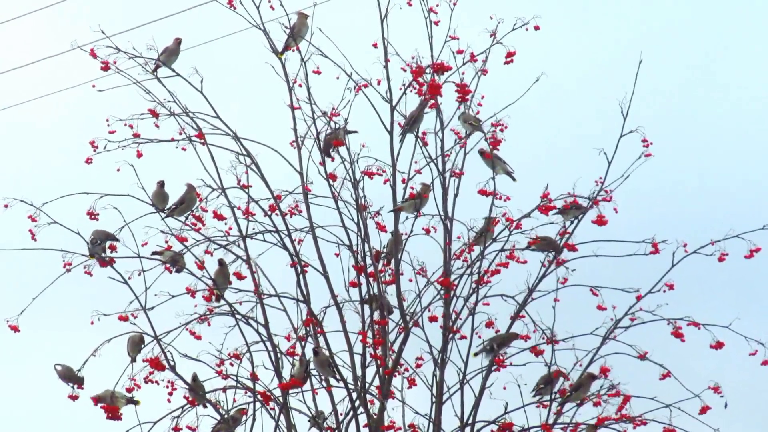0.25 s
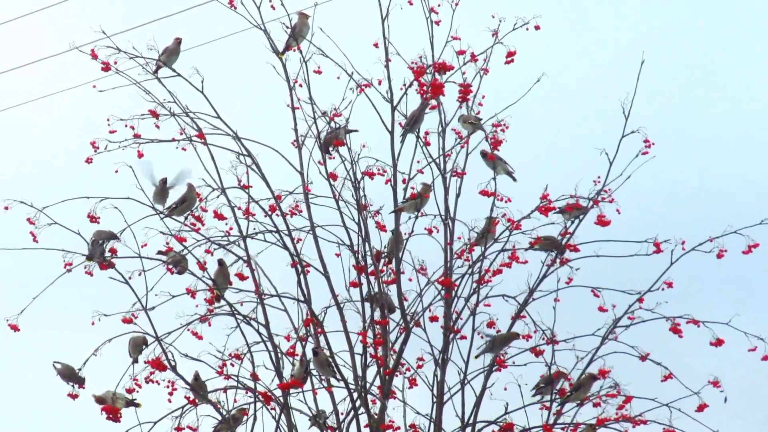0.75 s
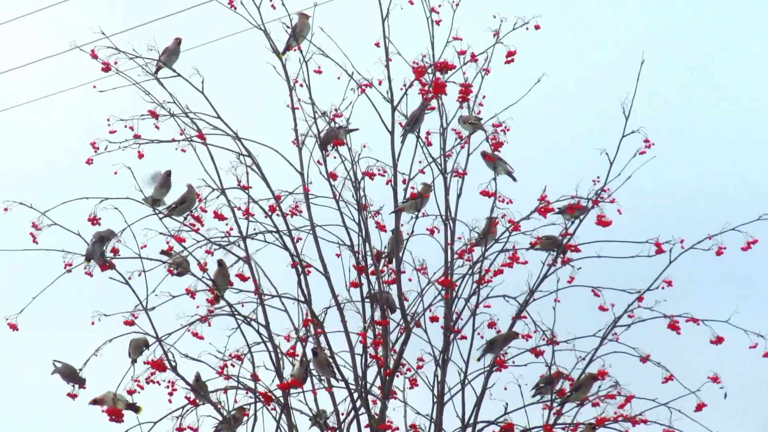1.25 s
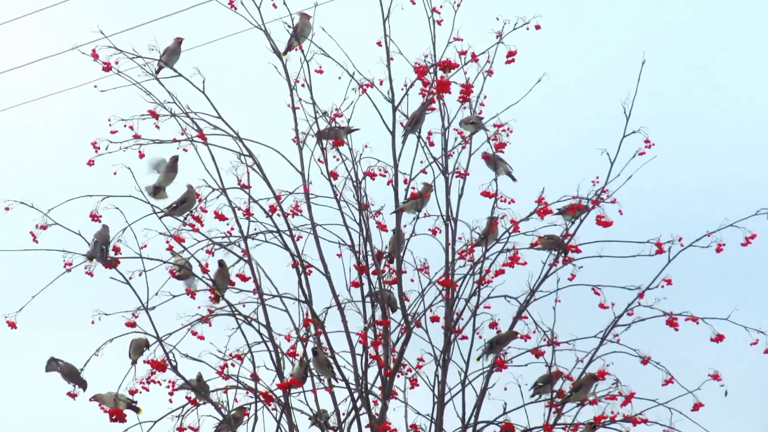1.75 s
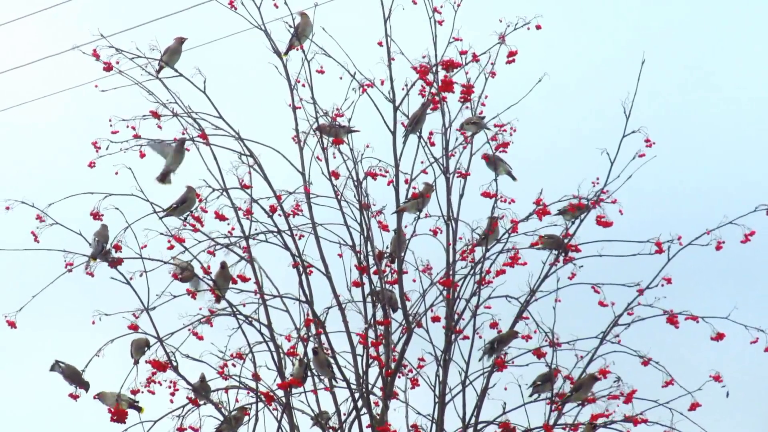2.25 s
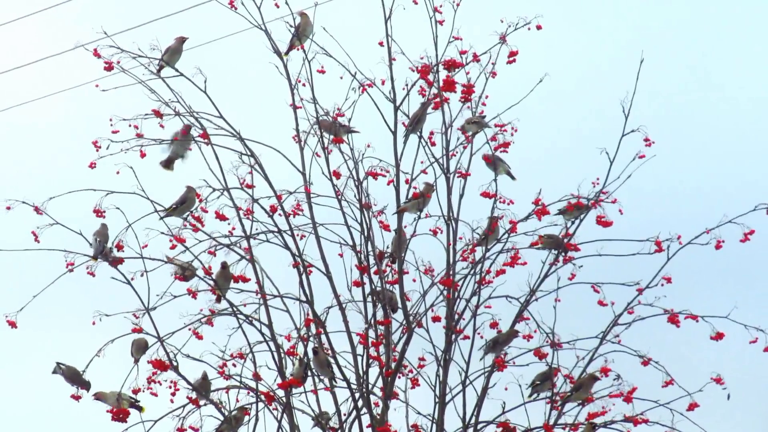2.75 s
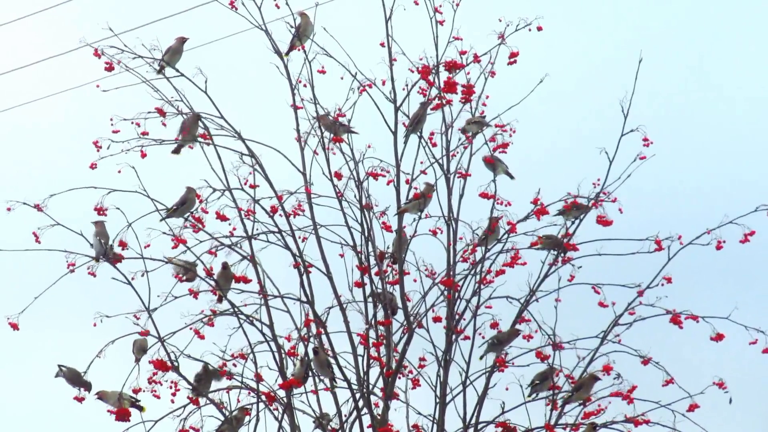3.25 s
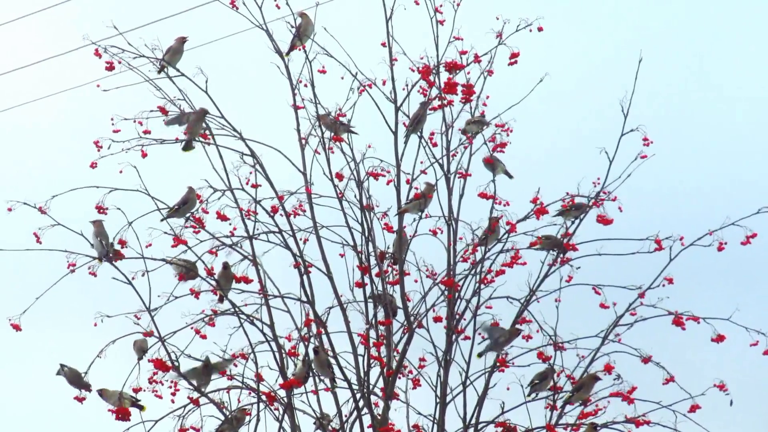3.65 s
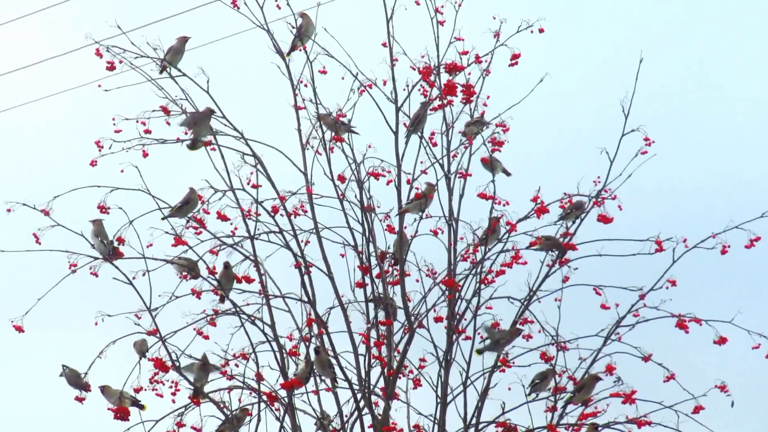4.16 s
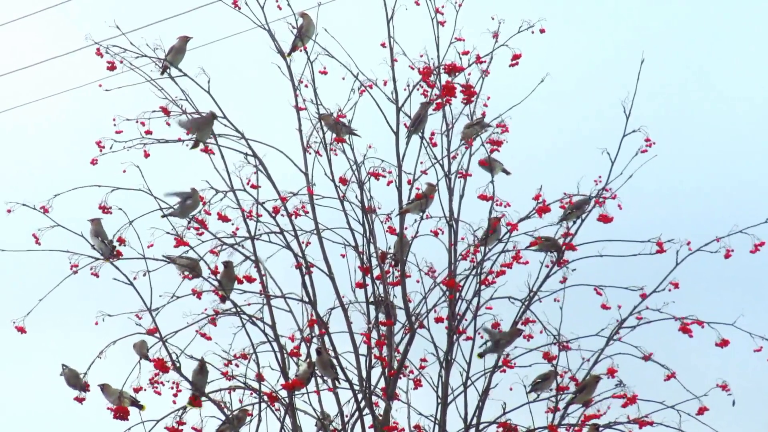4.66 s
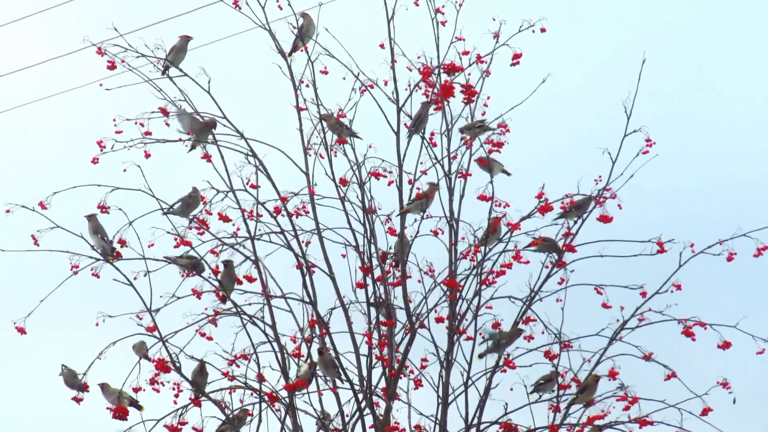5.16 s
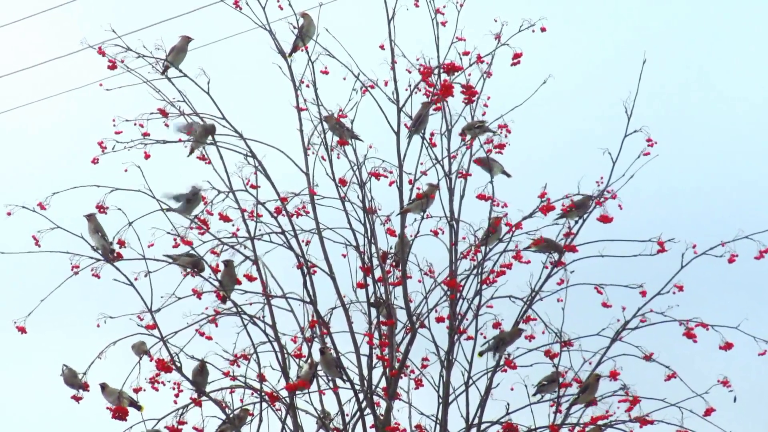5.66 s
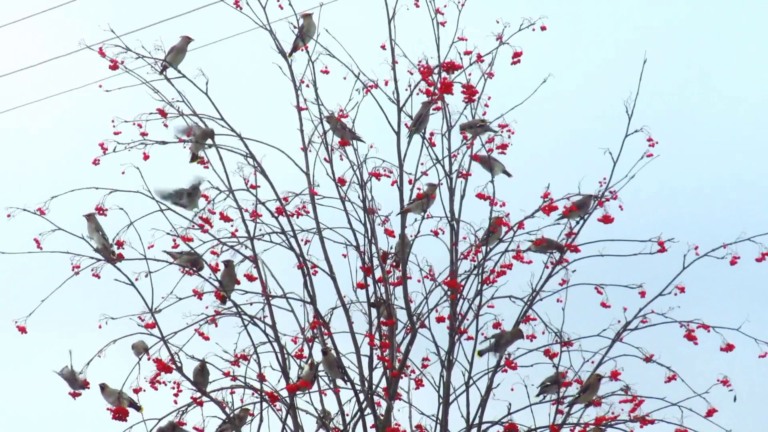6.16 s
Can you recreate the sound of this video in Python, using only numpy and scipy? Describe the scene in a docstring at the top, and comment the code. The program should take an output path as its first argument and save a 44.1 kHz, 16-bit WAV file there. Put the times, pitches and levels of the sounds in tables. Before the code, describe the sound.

Small birds in a berry tree outdoors. Faint whistles and chinking calls open, then one close finch sings loud high trills, scooping notes, a rattle, a flourish and a falling buzz. A softer second bird answers with a rising buzz and quick downward slides. A distant quiet warble ends it. Slight echo, low airy hiss and tiny wing flaps; stereo microphone outdoors.

```python
"""Songbirds among trees

A near finch sings three trills, a flourish and a falling buzz; a second answers from slightly to the left.
Distant birds whistle, chink and slur under a flock's thin trills, and a nearer bird warbles, while an earlier
song fades, all as gliding near-sines, some buzzing with fast pitch wobble. Trunks and ground scatter the notes
as an echo and decaying noise haze. Shaped noise makes far traffic and hiss; short noise bands make wing flaps
and rustles."""
import sys
import numpy as np
from scipy import signal
from scipy.fft import rfft, irfft, next_fast_len
from scipy.io import wavfile

SR = 44100
rng = np.random.default_rng(int(sys.argv[2]) if len(sys.argv) > 2 else 0)


def persist_wave(psi):
    """Save psi, clipped to +-1, as 16-bit WAV."""
    counts = np.round(np.clip(psi, -1, 1) * 32767).astype(np.int16)
    wavfile.write(sys.argv[1], SR, np.atleast_2d(counts).T)


N = 282681

# how sharply most calls bend onto their end pitch
HOOK = 2.5


def undb(db):
    """Turns decibels into an amplitude factor."""
    return 10 ** (np.asarray(db) / 20)


def unit(x):
    """Scales a signal to an RMS of one."""
    return x / np.sqrt(np.mean(x ** 2))


def add(out, s, x, pan_db):
    """Mixes x in at time s; pan_db is left minus right level."""
    i = int(s * SR)
    out[:, i:i + len(x)] += np.outer(undb([pan_db / 2, -pan_db / 2]), x[:N - i])


def walk(rate, size):
    """Random values, rate points per second, joined by lines."""
    points = rng.standard_normal(64 + int(rate * N / SR))
    return np.interp(np.arange(size) * rate / SR, np.arange(len(points)), points)


def air():
    """Far traffic and hiss: shaped noise in overlapping bands whose levels wander."""
    # colour of the noise: (frequency [Hz], relative level [dB])
    colour = [(18, -76.5), (30, -56), (81, -40), (182, -19.5), (332, -4), (443, -1), (691, -4.5), (767, -4),
              (852, -7), (1720, -14), (2760, -10), (4310, -18.5), (4660, -13), (5740, -20), (15500, -25)]
    # distant traffic comes and goes: (time [s], level [dB])
    swell = [(0, 0.3), (1.5, 0.5), (2.7, 2.7), (4, -1.14), (5.3, .2), (6.41, -2)]
    level_db, side_share, wander_db = -53.5, .83, .64
    size = next_fast_len(N)
    hz = np.maximum(np.fft.rfftfreq(size, 1 / SR), 1)
    mid, side = rng.standard_normal((2, size))
    # long waves reach both channels more alike
    unlike = side_share * np.clip(hz / 600, .6, 1)
    colour_hz, colour_db = np.transpose(colour)
    spectrum = rfft(mid) + unlike * rfft(side) * np.array([[1], [-1]])
    spectrum = spectrum * undb(np.interp(np.log(hz), np.log(colour_hz), colour_db))
    out = 0
    # band centres two octaves apart, as powers of two in Hz; the last band stays open at the top
    for octave in range(5, 15, 2):
        if octave < 13:
            share = np.clip(1 - abs(np.log2(hz) - octave) / 2, 0, 1)
        else:
            share = np.clip((np.log2(hz) - 11) / 2, 0, 1)
        band = irfft(spectrum * share, size)[:, :N]
        out = out + band * undb(wander_db * walk(5.5, size=N))
    return unit(out) * undb(level_db + np.interp(np.arange(N) / SR, *np.transpose(swell)))


def flock(count=200):
    """Many birds trill briefly at random: thin tones chopped into rising pips."""
    # loudness of the flock: (time [s], level [dB])
    loudness = [(0.0, -82), (1.1, -80), (1.19, -49), (1.5, -44.5), (2.0, -59), (2.43, -69), (2.84, -60),
                (2.98, -75), (3.39, -59), (3.71, -56), (3.92, -70), (4.21, -60.5), (4.55, -72), (4.8, -60),
                (5.07, -72.5), (5.91, -87), (6.41, -82)]
    centre_hz, pitch_range_hz, pip_rise_hz = 6780, 1976, 1672
    level_db = -4
    out = np.zeros((2, N))
    t = np.arange(int(.3 * SR)) / SR
    for place, pitch, size, side in rng.random((count, 4)):
        # louder birds also trill faster, around 24 pips a second
        beat = t * 24 * (.85 + .3 * size) % 1
        hz = centre_hz + pitch_range_hz * (pitch - .5) + pip_rise_hz * (beat - .5)
        tone = np.sin(2 * np.pi * np.cumsum(hz) / SR)
        pips = tone * np.sin(np.pi * beat) ** 4 * np.hanning(len(t))
        add(out, place * N / SR, pips * undb(13 * size), 12 * (side - .5))
    return unit(out) * undb(level_db + np.interp(np.arange(N) / SR, *np.transpose(loudness)))


def whistle(hz, db, swing_hz, rate_hz, bright_db):
    """A near-sine, buzzing if its pitch wobbles fast; weak overtones, roughened by fast random level
    changes, are strongest near one fixed pitch."""
    # overtones from the second harmonic up: (level before the bird's brightness [dB])
    overtone_db = [-42.5, -32.5, -31]
    peak_hz, peak_width_hz = 13270, 1700
    t = np.arange(len(hz)) / SR
    beat = 2 * np.pi * (rate_hz * t + .25 * walk(90, size=len(t)))
    hz = hz * (1 + .002 * walk(250, size=len(t)))
    # the wobble is widest where the note is highest
    hz = hz + swing_hz * (hz / hz.max()) ** 1.5 * np.sin(beat)
    phase = 2 * np.pi * np.cumsum(hz) / SR
    tone = np.sin(phase)
    for harmonic, over_db in enumerate(overtone_db, start=2):
        peak = np.exp(-((harmonic * hz - peak_hz) / peak_width_hz) ** 2)
        roughness = undb(over_db + bright_db) * walk(3000, size=len(t))
        tone += roughness * peak * np.sin(harmonic * phase)
    # 2 ms fades at both ends
    edge = np.clip(np.minimum(t, t[::-1]) / .002, 0, 1)
    level = undb(db + 1.3 * walk(180, size=len(t)))
    return tone * level * np.sin(edge * np.pi / 2) ** 2


def calls(table, hook, fade_db):
    """Single calls that swell in, glide quickly to their end pitch and may fade."""
    out = np.zeros((2, N))
    for s, length, start_hz, end_hz, db, pan_db, swing_hz in table:
        part = np.arange(0, 1, 1 / max(length * SR, 99))
        swell_db = db - 9 * (part - .55) ** 2 - 10 * np.exp(-part / .045) - fade_db * part
        hz = end_hz + (start_hz - end_hz) * (1 - part) ** hook
        add(out, s, whistle(hz, swell_db, swing_hz, 210, -30), pan_db)
    return out


def earlier_song(count=20):
    """The fading haze of an earlier song, made of short, strongly buzzing notes at random pitches."""
    level_db, fade_db_per_s, end_s = -52, 11, .8
    centre_hz, spread_hz, swing_hz = 3550, 1200, 600
    rows = []
    for k, (pitch, side) in enumerate(rng.uniform(-1, 1, (count, 2))):
        s = end_s * (k / count) ** 3
        hz = centre_hz + spread_hz * pitch
        rows.append((s, .05, 1.05 * hz, hz, level_db - fade_db_per_s * s, 4 * side, swing_hz))
    return calls(rows, HOOK, 0)


def whistlers():
    """Pure notes, nearly steady in pitch and level."""
    # (time [s], length [s], pitch [Hz], level [dB], left minus right [dB])
    notes = [(.041, .056, 3915, -32, -2), (.22, .29, 2025, -56.5, 2.5), (.529, .075, 3910, -33, -1.5),
             (1.06, .07, 3860, -34.5, -5), (1.602, .16, 2065, -65, 0), (3.533, .017, 4050, -53, -6),
             (3.57, .022, 3980, -54, 2), (4.898, .12, 6710, -60.5, -18), (5.18, .09, 2290, -60, -4),
             (5.448, .044, 1805, -56, -4), (5.55, .04, 1836, -61, -4), (5.62, .06, 1812, -63, -4),
             (5.71, .081, 2505, -61, -7), (6.248, .11, 2312, -58.5, -15)]
    fall = 1.003  # start pitch over end pitch
    rows = [(s, length, hz * fall, hz, db, pan_db, 0) for s, length, hz, db, pan_db in notes]
    return calls(rows, HOOK, .1)


def slurs():
    """Buzzy calls that slide from one pitch to another."""
    # (time [s], length [s], start [Hz], end [Hz], level [dB], left minus right [dB])
    slides = [(.106, .15, 3560, 2555, -45.5, -5), (.377, .082, 2800, 3315, -47, -5),
              (.46, .056, 3150, 3510, -53, -4), (1.44, .082, 2500, 4310, -51, 4),
              (4.39, .04, 4700, 4830, -43.5, 4), (4.538, .055, 7370, 7260, -61, -1),
              (4.574, .064, 6460, 6290, -50, -5), (4.728, .12, 7700, 7350, -53, -7),
              (5.037, .032, 4200, 4390, -47, -11), (5.11, .078, 3595, 3230, -43.5, -7)]
    swing_hz = 130
    return calls([(*slide, swing_hz) for slide in slides], HOOK, 0)


def chinks():
    """Short buzzy calls, hooked sharply down onto their pitch."""
    # (time [s], length [s], end pitch [Hz], level [dB])
    notes = [(.241, .085, 4480, -38), (.764, .095, 4330, -39.5), (1.287, .04, 9090, -44.5),
             (1.617, .035, 9060, -47), (2.022, .04, 8480, -43.5), (2.791, .069, 6550, -50.5),
             (5.093, .012, 3900, -41)]
    fall_hz, swing_hz, pan_db = 850, 130, -5
    rows = [(s, length, hz + fall_hz, hz, db, pan_db, swing_hz) for s, length, hz, db in notes]
    return calls(rows, 3.2, 0)


def flaps():
    """Short puffs of band noise: dull wing beats and bright rustles of feathers and twigs."""
    # dull wing flaps close by: (time [s], length [s], centre [Hz], level [dB])
    beats = [(1.571, .057, 795, -52.5), (1.633, .029, 504, -46.5), (1.918, .0088, 690, -45.5),
             (2.404, .069, 750, -46), (2.523, .046, 780, -46), (2.8, .18, 777, -55),
             (3.266, .016, 744, -52.5)]
    # bright rustles: (time [s], length [s], level [dB])
    rustles = [(.9, .035, -60), (3.558, .055, -60), (4.415, .08, -65), (5.292, .071, -57.5),
               (5.414, .093, -54.5)]
    beat_width, beat_pan_db = .6, 11  # width over centre; left minus right
    rustle_hz, rustle_width_hz = 8800, 8800
    out = np.zeros((2, N))
    rows = [(s, length, hz, beat_width * hz, db, beat_pan_db) for s, length, hz, db in beats]
    rows += [(s, length, rustle_hz, rustle_width_hz, db, 0) for s, length, db in rustles]
    for s, length, hz, width_hz, db, pan_db in rows:
        noise = rng.standard_normal(8192)[:int(length * SR)]
        edges_hz = [max(hz - width_hz / 2, 50), hz + width_hz / 2]
        band = signal.butter(3, edges_hz, "bandpass", fs=SR, output="sos")
        puff = unit(signal.sosfilt(band, noise)) * np.hanning(len(noise))
        add(out, s, undb(db) * puff, pan_db)
    return out


def syllable(shape, db, ratio, swing_hz, rate_hz, bright_db):
    """Every note of a shape, in its place, with pitch and level drawn by joined points."""
    out = np.zeros((2, SR // 2))
    for note in shape:
        s, hz, note_db = np.transpose(note)
        t = np.arange(s[0], max(s[-1], s[0] + .003), 1 / SR)
        pitch = ratio * np.interp(t, s, hz)
        level_db = db + np.interp(t, s, note_db)
        add(out, max(s[0], 0), whistle(pitch, level_db, swing_hz, rate_hz, bright_db), 0)
    return out[0]


def finch(song, repeats, pan_db, bright_db, sink):
    """Each phrase repeats one syllable, a little varied: perhaps soft at first, slowing or sinking in pitch."""
    soft_left = .6  # share of the soft start left after each syllable
    tiring_db = 2.5  # loss by a phrase's eighth syllable
    out = np.zeros((2, N))
    for phrase, count in zip(song, repeats):
        shape, first_s, spacing_s, slowing_s, db, soft_db, swing_hz, rate_hz = phrase
        for k in range(count):
            s = first_s + spacing_s * k + slowing_s * k * (k - 1) / 2
            ratio = sink ** k * (1 + .0047 * rng.standard_normal())
            level_db = db - soft_db * soft_left ** k - tiring_db * (k / 7) ** 4
            add(out, s, syllable(shape, level_db, ratio, swing_hz, rate_hz, bright_db), pan_db)
    return out


def near_finch():
    """Close song of three trills, a flourish and a falling buzz, with the strongest overtones."""
    # syllable shapes, each a list of notes: points (time [s], pitch [Hz], level [dB])
    HIGH_TRILL = [
        [(0, 6970, -17), (.004, 6380, 0.5), (.007, 6170, -8), (.013, 4110, -18.5)],
        [(.022, 5320, -17), (.035, 5270, -11)],
        [(.036, 5270, -4.5), (.040, 3800, -13), (.044, 5710, -13), (.046, 6270, 2), (.049, 7000, -22),
         (.058, 7700, -22.5), (.075, 7600, -30)],
    ]
    # dips and climbs again: points as above
    SCOOP = [
        [(0, 6800, 1), (.004, 4500, -21.5)],
        [(.010, 4770, -17.5), (.016, 5045, -2), (.024, 4770, -11), (.030, 4800, -26.5)],
        [(.044, 5562, -15), (.052, 4280, 1), (.058, 3858, -6.5), (.066, 3607, -6), (.073, 3070, -7.5)],
        [(.077, 3430, 2), (.082, 3950, -13), (.088, 4060, 0), (.094, 4300, -2), (.100, 5520, -5.5),
         (.105, 5870, -15), (.113, 5980, -24.5)],
    ]
    # a quick hump of pitch, then a fall: points as above
    RATTLE = [
        [(0, 3250, -13), (.007, 3400, -8), (.014, 3420, -11)],
        [(.014, 3600, -9), (.016, 4200, -6), (.019, 5050, -4), (.025, 4200, -1), (.030, 3750, -8)],
        [(.034, 3300, -14), (.040, 3080, -1), (.045, 2950, -9), (.057, 1950, -19)],
    ]
    # one wide leap up and down: points as above
    FLOURISH = [
        [(0, 7000, -15.5), (.005, 5000, -17.5)],
        [(.036, 2028, -31), (.048, 2910, -17), (.056, 3150, -2), (.064, 3500, -16), (.074, 3868, -3),
         (.082, 4600, -13), (.089, 3100, -7.5), (.106, 1950, -23)],
    ]
    # a long fall: points as above
    FALLING_BUZZ = [
        [(0, 4950, -7), (.030, 5040, 1.5), (.080, 4880, -1.5), (.094, 4150, 0), (.110, 3253, -0.5),
         (.135, 2500, -9.5), (.160, 2220, -15), (.185, 2030, -15.5)],
    ]
    # phrases: (shape, first syllable [s], spacing [s], slowing per syllable [s], level [dB],
    # softer start [dB], buzz swing [Hz], buzz rate [Hz])
    song = [(HIGH_TRILL, 1.112, .1058, 0, -14, 31, 0, 0), (SCOOP, 1.643, .1655, .0035, -9.5, 4, 0, 0),
            (RATTLE, 2.312, .0897, .0012, -12.8, 1.5, 0, 0), (FLOURISH, 2.810, 0, 0, -8.5, 0, 0, 0),
            (FALLING_BUZZ, 2.982, 0, 0, -19.5, 0, 490, 230)]
    # (syllables in each phrase)
    repeats = [5, 4, 5, 1, 1]
    return finch(song, repeats, 1.5, 0, 1)


def pair_trill():
    """A distant trill of overlapping notes that sinks in pitch from one syllable to the next."""
    # syllable shape, a list of notes: points (time [s], pitch [Hz], level [dB])
    PAIR = [
        [(0, 4900, -14), (.005, 5400, 0), (.024, 5340, -8)],
        [(.045, 6200, -4), (.064, 6150, -11)],
        [(.035, 7300, -17), (.055, 7150, -17)],
    ]
    # phrase: (shape, first syllable [s], spacing [s], slowing per syllable [s], level [dB],
    # softer start [dB], buzz swing [Hz], buzz rate [Hz])
    song = [(PAIR, 3.258, .0967, 0, -34, 12, 70, 150)]
    # (syllables in the phrase)
    repeats = [6]
    return finch(song, repeats, 7.5, -30, .986)


def answering_finch():
    """The second finch: a lead-in, a rising buzz and a run of downward slides."""
    # syllable shapes, each a list of notes: points (time [s], pitch [Hz], level [dB])
    LEAD_IN = [
        [(0, 3340, -17), (.005, 3860, -8), (.020, 4060, -5), (.023, 4190, -6), (.032, 3900, -0.5),
         (.046, 2910, -11)],
    ]
    # a long climb: points as above
    RISING_BUZZ = [
        [(0, 2500, -11.5), (.040, 3357, 0), (.085, 4200, -2), (.120, 4700, -2), (.160, 4630, -11),
         (.200, 4450, -6.5)],
    ]
    # a faint tick, then a steep fall: points as above
    SLIDE = [
        [(.001, 5100, -17), (.006, 6500, -18)],
        [(.012, 4593, -6.5), (.019, 3855, -2.5), (.025, 3492, 0), (.034, 3083, -3.5), (.045, 2550, -6),
         (.059, 1770, -22.5)],
    ]
    # phrases: (shape, first syllable [s], spacing [s], slowing per syllable [s], level [dB],
    # softer start [dB], buzz swing [Hz], buzz rate [Hz])
    song = [(LEAD_IN, 3.843, 0, 0, -24, 0, 0, 0), (RISING_BUZZ, 3.892, 0, 0, -31, 0, 240, 200),
            (SLIDE, 4.1, .0926, .00122, -23.8, 0, 0, 0)]
    # (syllables in each phrase)
    repeats = [1, 1, 8]
    return finch(song, repeats, 4.5, -29, 1)


def warbler():
    """Quick down-strokes between slower, buzzy rises."""
    # down-strokes: (time [s], end pitch [Hz], level [dB])
    strokes = [(5.38, 4500, -48), (5.42, 3750, -40), (5.457, 4000, -50), (5.545, 3010, -43),
               (5.577, 3680, -35), (5.618, 3830, -38.5), (5.711, 4010, -45.5), (5.758, 3900, -41.5),
               (5.823, 2880, -49), (5.885, 2560, -50.5)]
    # rising notes: (time [s], end pitch [Hz], level [dB])
    rises = [(5.468, 3130, -45), (5.49, 3664, -38), (5.565, 3500, -48), (5.665, 4240, -51),
             (5.775, 3235, -46), (5.845, 3326, -45.5)]
    stroke_s, stroke_from = .011, 1.18  # length; start pitch over end pitch
    rise_s, rise_from, rise_swing_hz = .024, .89, 150
    pan_db = -6
    rows = [(s, stroke_s, hz * stroke_from, hz, db, pan_db, 0) for s, hz, db in strokes]
    rows += [(s, rise_s, hz * rise_from, hz, db, pan_db, rise_swing_hz) for s, hz, db in rises]
    return calls(rows, HOOK, 0)


def trees(x, echo_s, echo_db, haze_db, low_t60, high_t60, unlike):
    """Direct sound, one clear echo and a dense decaying haze; the treble dies sooner."""
    t = np.arange(SR) / SR
    mid, side = rng.standard_normal((2, SR))
    noise = mid + unlike * side * np.array([[1], [-1]])
    low = signal.sosfilt(signal.butter(2, 3500, fs=SR, output="sos"), noise)
    below = signal.sosfilt(signal.butter(2, 7000, fs=SR, output="sos"), noise)
    haze = low * undb(-60 * t / low_t60)
    haze += (noise - below) * undb(-60 * t / high_t60)
    haze += (below - low) * undb(-60 * t / np.sqrt(low_t60 * high_t60))
    # the nearest branches return more than the far trunks
    haze *= np.clip(t / .002, 0, 1) * (1 + 1.49 * np.exp(-t / .062))
    haze *= undb(haze_db) / np.sqrt(np.sum(haze[0] ** 2))
    haze[:, int(echo_s * SR)] += undb(echo_db)
    return x + signal.fftconvolve(x, haze, axes=1)[:, :N]


def scene():
    """Air, wings and four groups of birds, each group with its own scatter by the trees."""
    # scatter around the near finch: (first echo [s], echo [dB], haze [dB], low-band t60 [s],
    # treble t60 [s], share unlike left and right [ratio])
    near_trees = (.012, -9, -1, 1.14, 0.53, 0.52)
    # columns as above, around the answering finch
    answer_trees = (.014, -6.5, 1.5, 1.5, .5, 0.6)
    # columns as above, around the warbler
    mid_trees = (.03, -14, 1.2, 1.5, .5, .6)
    # columns as above, around the distant birds
    far_trees = (.021, -8, 5.3, 1.83, .93, 1)
    distant = flock() + earlier_song() + whistlers() + slurs() + chinks() + pair_trill()
    far = trees(distant, *far_trees)
    near = trees(near_finch(), *near_trees)
    answer = trees(answering_finch(), *answer_trees)
    warble = trees(warbler(), *mid_trees)
    return air() + far + flaps() + near + answer + warble


def record(dry):
    """The microphone cuts the bass, the recorder the top."""
    low_cut_hz, top_hz = 222, 15730
    dry = signal.sosfilt(signal.butter(2, low_cut_hz, "highpass", fs=SR, output="sos"), dry)
    return signal.sosfilt(signal.ellip(14, .2, 80, top_hz, fs=SR, output="sos"), dry)


dry = scene()
out = record(dry)
persist_wave(out)
```